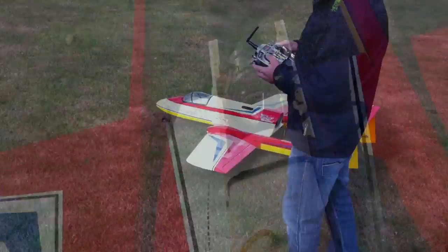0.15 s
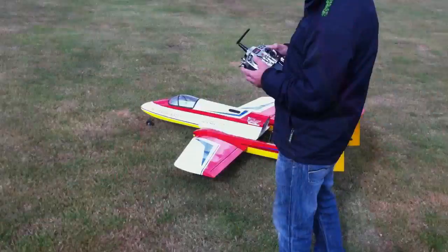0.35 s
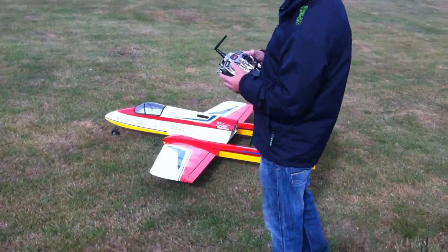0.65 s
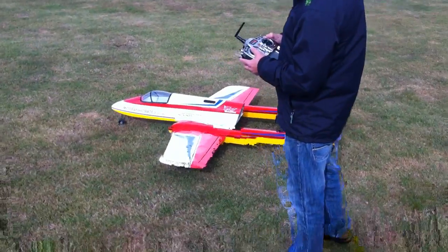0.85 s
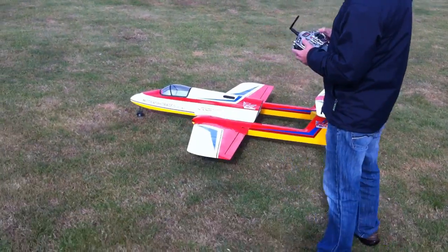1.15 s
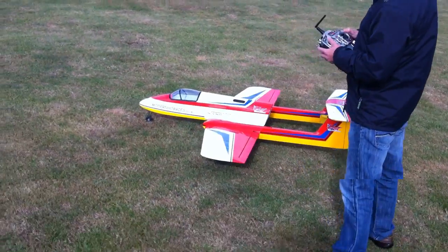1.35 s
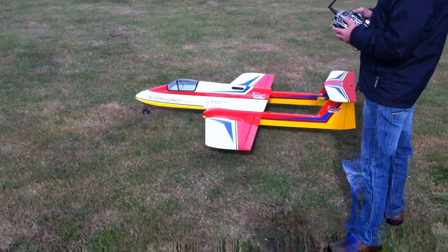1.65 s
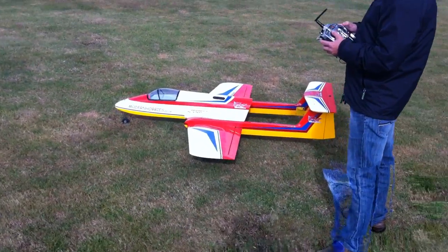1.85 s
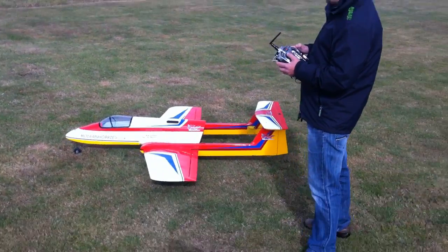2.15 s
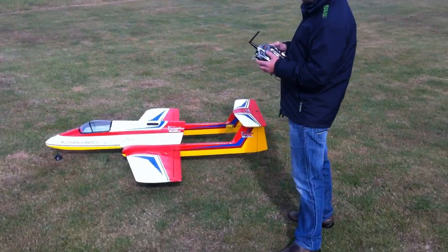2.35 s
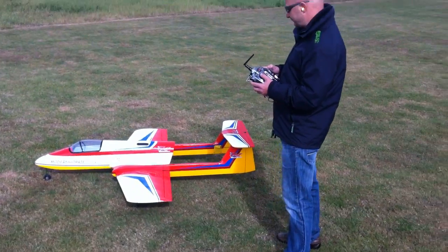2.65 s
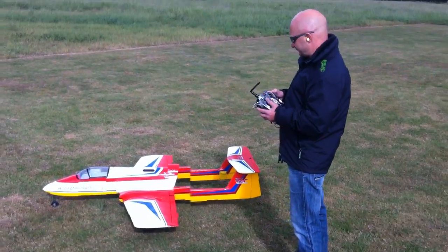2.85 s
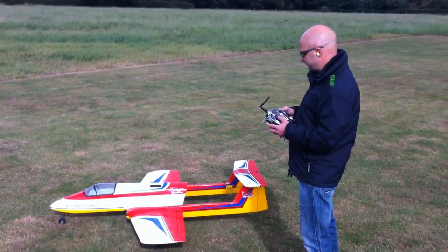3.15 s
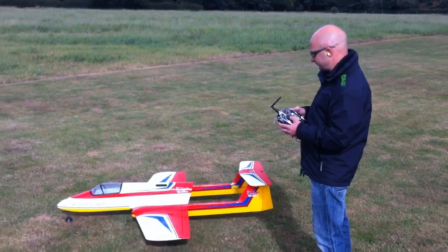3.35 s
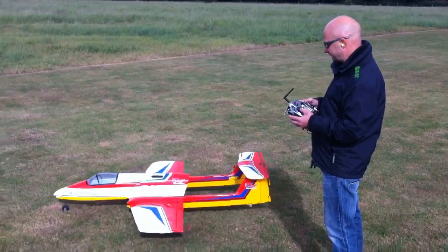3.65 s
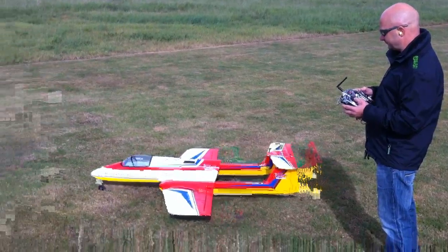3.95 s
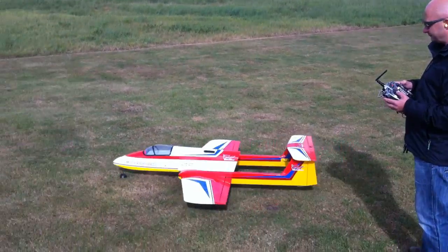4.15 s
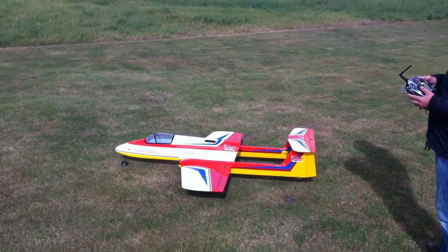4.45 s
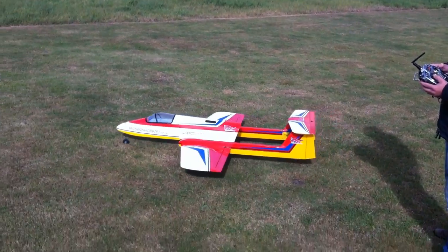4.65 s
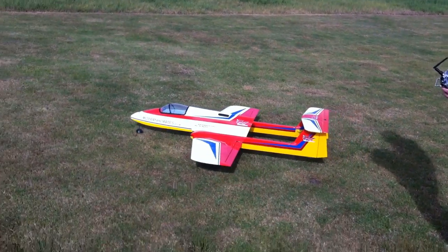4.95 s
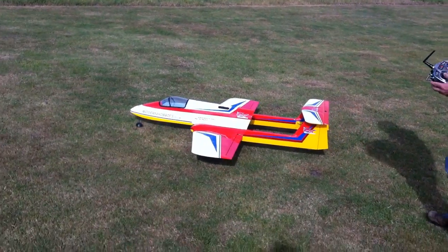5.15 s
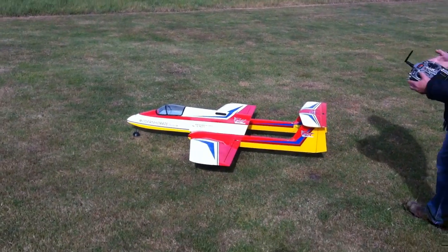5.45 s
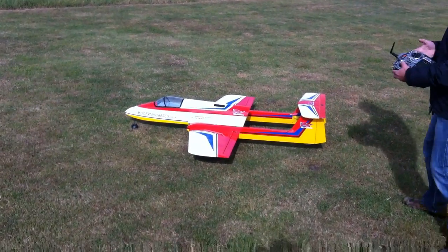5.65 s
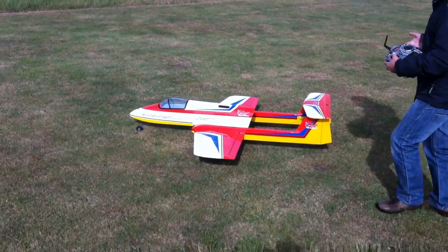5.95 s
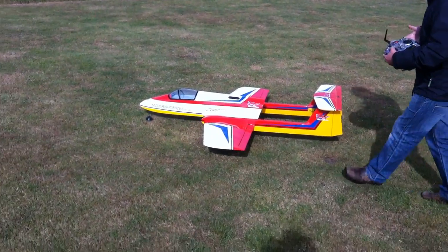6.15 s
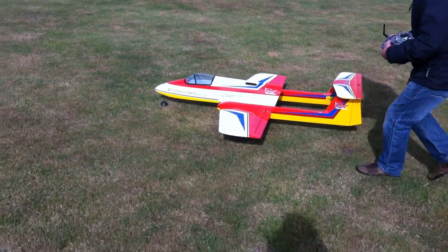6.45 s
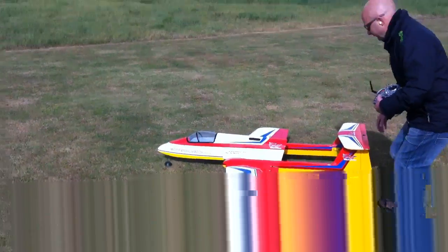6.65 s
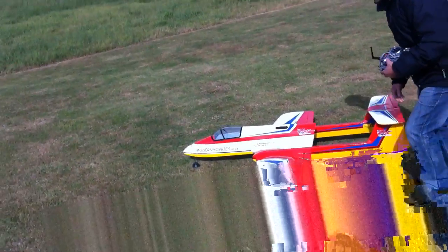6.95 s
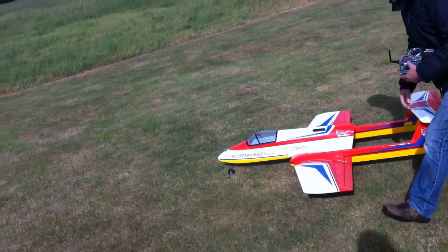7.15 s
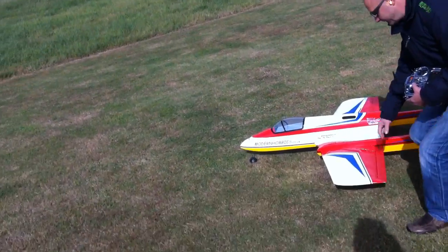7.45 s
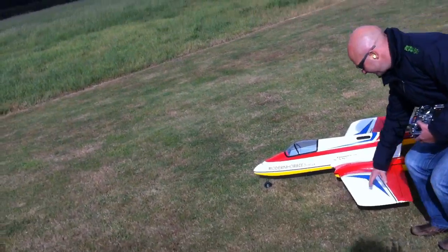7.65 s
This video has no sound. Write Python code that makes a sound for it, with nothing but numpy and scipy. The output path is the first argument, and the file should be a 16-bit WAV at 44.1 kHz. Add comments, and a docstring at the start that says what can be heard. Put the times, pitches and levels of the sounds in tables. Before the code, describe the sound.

On open grass, a model jet's small turbine hisses and roars close to a handheld microphone. A piercing whistle fades at once; the whine dips slightly, climbs to a peak near the middle, eases back, holds, then winds down as the exhaust thins. Wind thumps and rasps on the microphone, heaviest around the middle, briefly making the level duck.

```python
"""A model jet's small turbine is run up, eased back, held and let down to idle.
Its exhaust, shaped noise, roars and hisses; a reflection that shifts as the microphone moves hollows it.
The shaft hums and the compressor blades whistle: tones at multiples of the shaft speed.
A separate high whistle fades out at the start. Wind rumbles and rasps at the microphone in gusts,
and an automatic gain control briefly turns down what is too loud."""
import sys
import numpy as np
from scipy import signal
from scipy.fft import rfft, irfft, next_fast_len
from scipy.io import wavfile
from scipy.ndimage import uniform_filter1d

SR = 44100
rng = np.random.default_rng(int(sys.argv[2]) if len(sys.argv) > 2 else 0)


def pcm_store(signal):
    """Save signal as 16-bit PCM."""
    levels = np.round(np.clip(np.atleast_2d(signal), -1, 1) * 32767)
    wavfile.write(sys.argv[1], SR, levels.astype(np.int16).T)


N = 343962
TIME = np.arange(N) / SR

# How fast the shaft spins. Each row: time in seconds, speed in turns a second.
SHAFT_SPEED = [(0.0, 1341), (0.26, 1320), (0.7, 1227), (0.95, 1212), (1.27, 1244), (2.15, 1449),
               (2.59, 1523), (3.18, 1736), (3.42, 1744), (3.95, 1603), (4.49, 1428), (4.89, 1339),
               (5.82, 1329), (6.24, 1261), (6.68, 1124), (7.14, 978), (7.39, 919), (7.8, 856)]
# How loud the exhaust is heard. Each row: time in seconds, relative level in dB.
EXHAUST_LEVEL = [(0, -23), (.65, -22), (1.1, -19), (1.7, -18), (2.55, -20), (2.8, -17), (3.1, -21),
                 (3.52, -21), (3.95, -26.5), (4.55, -27), (5.3, -22), (6.1, -20.5), (6.2, -30.5),
                 (6.55, -28.5), (6.85, -35), (7.45, -37.5), (7.8, -45)]


def amp(db):
    """Turns decibels into a gain."""
    return 10 ** (np.asarray(db) / 20)


def unit(x):
    """Scales a signal to an rms (average strength) of one."""
    return x / np.sqrt(np.mean(x ** 2) + 1e-20)


def curve(rows, t=TIME):
    """Joins the points of each table column by straight lines in time."""
    seconds, *columns = np.transpose(rows)
    return [np.interp(t, seconds, column) for column in columns]


def spectrum(points, hz):
    """Reads dB values between table points, on a log-frequency axis."""
    point_hz, db = np.transpose(points)
    return np.interp(np.log(hz + 1), np.log(point_hz), db)


def bell(s, half_length):
    """A smooth rise and fall around one moment."""
    return np.exp(-((TIME - s) / half_length) ** 2)


def swells(rows):
    """Adds up the dB of all swells in a table, as a curve over time."""
    return sum(db * bell(s, half_length) for s, db, half_length in rows)


def noise(points):
    """Steady noise: random samples filtered to a given spectrum."""
    size = next_fast_len(N)
    gain = amp(spectrum(points, np.fft.rfftfreq(size, 1 / SR)))
    shaped = irfft(rfft(rng.standard_normal(size)) * gain, size)
    return unit(shaped[:N])


def wander(rate_hz, size=16384):
    """A smooth random curve; changes much faster than the given rate are filtered away."""
    t = np.linspace(0, TIME[-1], size)
    gain = np.exp(-(np.fft.rfftfreq(size, t[1]) / rate_hz) ** 2)
    smooth = irfft(rfft(rng.standard_normal(size)) * gain, size)
    return np.interp(TIME, t, unit(smooth))


def tone(turns, db, scatter, flutter_hz):
    """A pure tone that swells and fades as part of it is scattered by moving air."""
    scattered = wander(flutter_hz) + 1j * wander(flutter_hz)
    path = (1 + scatter * scattered) / np.sqrt(1 + 2 * scatter ** 2)  # keeps the average power
    return np.sqrt(2) * amp(db) * (path * np.exp(2j * np.pi * turns)).real


def exhaust(level_db=6.0, patch_db=1.32, ripple_db=0.57, swirl_db=0.32, drift=0.012):
    """Turbulent jet noise with moving reflection dips; near idle it thins to an airy rush."""
    # Changing tone colour. Each row: time in seconds, then roar, hiss and finest fizz, each in dB.
    colour = [(0, -0.5, 0.5, 6), (.45, -4.5, -1, 8), (1.1, -3.5, -1, 4.5), (1.6, .5, -2.5, 2.5),
              (2.7, -2, 0, 0), (3.65, -1, 0.5, 3), (4.2, -0.5, 1.5, -1), (5.1, 0, 2.5, 4), (5.95, 0, 0, -1),
              (6.8, 0.5, 2.5, 5.5), (7.8, 4.5, 4, -4)]
    # Spectrum under power. Each row: frequency in Hz, relative level per Hz in dB.
    jet_spectrum = [(40, -44), (130, -43), (300, -1), (580, -8.5), (850, 0), (1250, 6.5), (1650, 0),
                    (1980, 2), (2350, -5), (3700, 1.5), (4900, 0.5), (7500, -2.5), (12500, -4.5),
                    (16000, -9.5)]
    # Spectrum near idle. Each row: frequency in Hz, relative level per Hz in dB.
    idle_spectrum = [(40, -40), (300, -2), (600, -24), (1000, 5), (1700, 2.5), (2250, -4), (2900, 2.5),
                     (3400, 4.5), (3750, -3.5), (4300, 0), (6000, -2.5), (9000, -5), (13000, -8),
                     (16000, -14)]
    # Bands that the reflection cancels. Each row: centre in Hz before shifting, power of the shift factor
    # that it follows, half width in Hz, depth in dB.
    dips = [(2743, 0.73, 243, -11.5), (6025, 0.89, 425, -14), (10300, 0.58, 970, -11),
            (14250, 0.47, 430, -16)]
    # The reflection's path changes and moves all dips. Each row: time in seconds, factor on frequency.
    reflection = [(0, 0.96), (1.1, 0.96), (1.75, 0.91), (2.8, 1.16), (3.5, 1.16), (3.85, 1.19),
                  (4.35, 1.07), (4.9, 1.075), (5.5, 1.006), (6.4, 0.99), (6.72, 1.045)]

    frame, hop = 1024, 256  # samples in each short spectrum, and between them
    t = np.arange(N // hop + 5)[:, None] * hop / SR
    hz = np.fft.rfftfreq(frame, 1 / SR)
    idling = np.interp(curve(SHAFT_SPEED, t)[0], [1060, 1105], [1, 0])  # by turns a second
    roar, hiss, fizz = curve(colour, t)
    db = (1 - idling) * spectrum(jet_spectrum, hz) + idling * spectrum(idle_spectrum, hz)
    db = db + roar * np.interp(hz, [1900, 3300], [1, 0])
    db = db + hiss * np.interp(hz, [5000, 7500], [0, 1])
    db = db + fizz * np.interp(hz, [9500, 14500], [0, 1])

    shift = curve(reflection, t)[0]
    for centre_hz, follow, half_width, dip_db in dips:
        sway = 1 + drift * np.interp(t, TIME, wander(8.9))  # the sound path sways in the wind
        offset = (hz - centre_hz * shift ** follow * sway) / half_width
        db = db + (1 - idling) * dip_db / (1 + offset ** 2)

    real, imag, patches, ripple = rng.standard_normal((len(t), len(hz), 4)).T
    # Eddies lift and sink quick patches; weaker echoes leave a slow, fine ripple.
    # Both are smoothed over frequency first, then over time.
    patches = unit(uniform_filter1d(uniform_filter1d(patches, size=7, axis=0), size=18, axis=1))
    ripple = unit(uniform_filter1d(uniform_filter1d(ripple, size=5, axis=0), size=110, axis=1))
    ripple_share = np.minimum(hz / 4000, 1)[:, None]  # less ripple in the low sounds
    gain = amp(db.T + patch_db * patches + ripple_db * ripple * ripple_share)
    jet = signal.istft((real + 1j * imag) * gain, nperseg=frame, noverlap=frame - hop)[1][:N]
    return unit(jet) * amp(level_db + curve(EXHAUST_LEVEL)[0] + swirl_db * wander(30))


def rotor(hum_db=-1.5, waver=0.0006, halo_db=-12.5, fading_db=2.5, top_fading_db=2.0, follow=0.35):
    """Shaft hum and blade whistles, all locked to one turning shaft; each whistle fades by chance."""
    # Loudness of the hum. Each row: time in seconds, relative level in dB.
    hum_levels = [(0, -40), (1.35, -32), (1.6, -21.5), (2.55, -29.5), (2.8, -19.5), (3.05, -33), (3.6, -36),
                  (3.88, -23.5), (4.2, -38), (4.7, -30), (5.6, -25.5), (6.15, -40), (6.45, -29),
                  (6.95, -36), (7.28, -23.5), (7.8, -41.5)]
    # Main blade whistle and its weaker neighbour. Each row: multiple of shaft speed, base level in dB.
    main_orders = [(7, -40), (8, -46.5)]
    # The main whistle stands out at low speed early on. Each row: time in seconds, rise in dB,
    # half length in seconds.
    main_swells = [(.82, 7.5, .42)]
    # Whistle of all blades, and weaker lines from uneven blades. Each row: multiple of shaft speed,
    # base level in dB.
    top_orders = [(11, -56), (12, -47), (13, -48), (14, -29)]
    # Its swells on the way to idle. Each row: time in seconds, rise in dB, half length in seconds.
    top_swells = [(6.89, 10.5, 0.048), (7.46, 7, 0.065)]
    # The top whistles come in as the highest sinks through this range: lower and upper edge in Hz.
    top_sinks_hz = (15200, 15900)
    main_blades, inertia_s = 7, 0.17  # the shaft's inertia smooths its speed over this many seconds
    sinks_above, sink_db = 1500, 0.4  # turns a second; dB lost for each further turn a second

    speed = uniform_filter1d(curve(SHAFT_SPEED)[0], size=round(inertia_s * SR), mode="nearest")
    turns = np.cumsum(speed * (1 + waver * wander(32))) / SR
    hum, exhaust_db = curve(hum_levels)[0], curve(EXHAUST_LEVEL)[0]
    out = tone(turns, hum + hum_db, scatter=0.1, flutter_hz=19)
    out += tone(turns, hum + halo_db, scatter=2.8, flutter_hz=55)  # the hot jet smears part of the hum

    main = swells(main_swells) + follow * (exhaust_db - exhaust_db.mean())  # partly follows the exhaust
    main = main - sink_db * np.maximum(speed - sinks_above, 0)  # at high speed it sinks into the roar
    for order, db in main_orders:
        level_db = db + main + fading_db * wander(3.4)
        out += tone(order * turns, level_db, scatter=0.6, flutter_hz=50)

    heard = np.interp(2 * main_blades * speed, top_sinks_hz, [1, 0])
    top = swells(top_swells)
    for order, db in top_orders:
        level_db = db + top + top_fading_db * wander(5.5)
        out += heard * tone(order * turns, level_db, scatter=0.48, flutter_hz=25.3)
    return out


def idle_whistle():
    """An idling turbine's high blade whistle: it sags in pitch, holds its level, then fades out."""
    settled_hz, sag_hz, sag_s = 11000, 330, 0.19  # it starts higher by the sag
    start_db, hold_s, fade_db_per_s = -19, 0.14, 75
    hz = settled_hz + sag_hz * np.exp(-TIME / sag_s)
    db = start_db - fade_db_per_s * np.maximum(TIME - hold_s, 0)
    return tone(np.cumsum(hz) / SR, db, scatter=0.13, flutter_hz=40)


def wind(gust_db=0.0, lump_db=2.5, rasp_db=1.0):
    """Lumpy rumble of wind at the microphone; the harder it blows, the more it rasps."""
    # Gusts. Each row: time in seconds, peak in dB, half length in seconds.
    gusts = [(0.168, -19.5, 0.017), (0.217, -14.5, 0.024), (2.418, -21, 0.026), (2.494, -14, 0.015),
             (2.595, -19, .015), (2.906, -11, 0.018), (2.948, -13.5, 0.0065), (3, -10.5, .02),
             (3.119, -9, 0.029), (3.46, -14.5, 0.053), (3.566, -8.5, 0.021), (3.742, -9, 0.017),
             (3.894, -8.5, 0.0089), (4.114, -12, 0.024), (4.245, -13.5, 0.027), (4.846, -22, 0.013),
             (5.125, -16, 0.039), (6.118, -12.5, 0.023), (6.153, -12, 0.016), (6.253, -14.5, .012),
             (6.351, -20, 0.037), (6.836, -22, 0.0098)]
    # Broad surges of the breeze. Each row: time in seconds, rise in dB, half length in seconds.
    surges = [(1.0, 4.5, 0.32), (3.0, 4, 0.18), (3.85, 6.5, 0.33), (7.75, 3, 0.17)]
    # Spectrum of the rumble. Each row: frequency in Hz, relative level per Hz in dB.
    rumble_spectrum = [(20, -50), (45, -50), (85, -17.5), (135, -1), (200, 2.5), (350, -2), (550, -14),
                       (1000, -20.5), (2500, -29), (16000, -80)]
    # Spectrum of the rasp. Each row: frequency in Hz, relative level per Hz in dB.
    rasp_spectrum = [(20, -31), (150, -43), (400, 1), (750, 0.5), (1300, -8), (2200, -18), (4000, -34),
                     (16000, -52)]
    breeze_db, breeze_db_per_s = -27.5, -0.38  # level halfway through; it slackens slowly
    lull_db, lull_from_s, lull_to_s, lull_edge_s = -7.5, 4.33, 4.95, 0.04

    inside_lull = np.minimum(TIME - lull_from_s, lull_to_s - TIME)
    lull = np.clip(inside_lull / lull_edge_s + 0.5, 0, 1)
    breeze = breeze_db + breeze_db_per_s * (TIME - TIME.mean()) + swells(surges) + lull_db * lull
    power = amp(breeze) ** 2
    for s, db, half_length in gusts:
        power = power + amp(db + gust_db) ** 2 * bell(s, half_length)
    force = np.sqrt(power)

    rumble = noise(rumble_spectrum)
    rumble /= np.sqrt(uniform_filter1d(rumble ** 2, size=800))  # eddies of like strength follow on
    lumps = amp(lump_db * wander(49) / (1 + (force / 1.35) ** 2))  # light air is the most fitful
    rasp = noise(rasp_spectrum) * amp(rasp_db + 5.2 * wander(170)) * force ** 1.87
    return force * rumble * lumps + rasp


def scene():
    """Turbine and wind, alike in both channels."""
    mix = exhaust() + rotor() + idle_whistle() + wind()
    return np.array([mix, mix])


def record(dry, threshold_db=-10.5, squeeze=0.5, recovery_db_per_s=35):
    """Gain control ducks loud moments and recovers; peaks are rounded off, the top treble cut."""
    edge_hz = 15780
    power_db = 10 * np.log10(abs(uniform_filter1d(dry[0] ** 2, size=300)) + 1e-12)
    # The level rises at once and falls back at a steady rate.
    recovery = TIME * recovery_db_per_s
    held_db = np.maximum.accumulate(power_db + recovery) - recovery
    over_db = np.maximum(held_db - threshold_db, 0)
    smooth_over_db = signal.lfilter([0.003], [1, -0.997], over_db)
    ducked = dry * amp(-squeeze * smooth_over_db)
    rounded = ducked / (1 + ducked ** 6) ** (1 / 6)
    low_pass = signal.firwin(511, edge_hz, window=("kaiser", 9), fs=SR)
    return signal.oaconvolve(rounded, low_pass[None], "same")


dry = scene()
out = record(dry)
pcm_store(out)
```